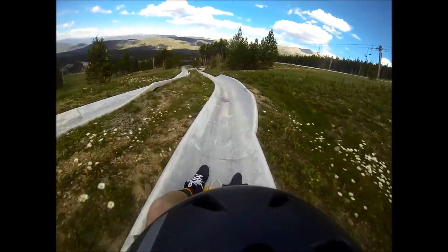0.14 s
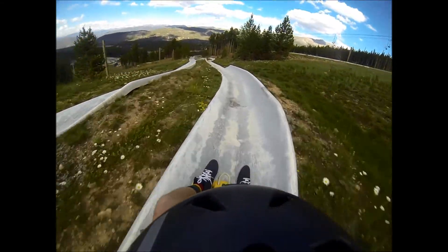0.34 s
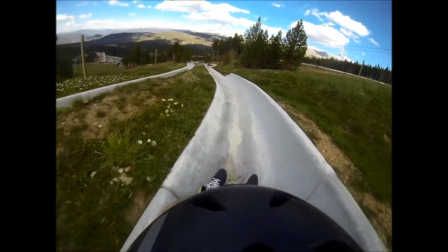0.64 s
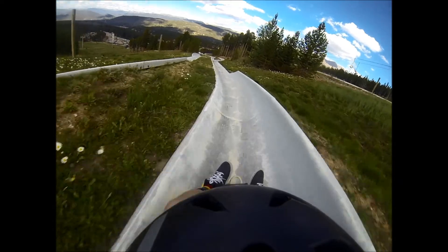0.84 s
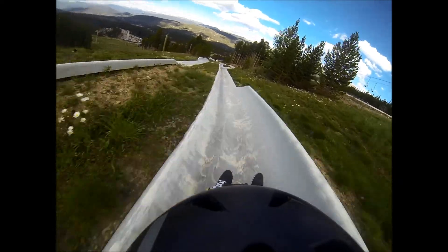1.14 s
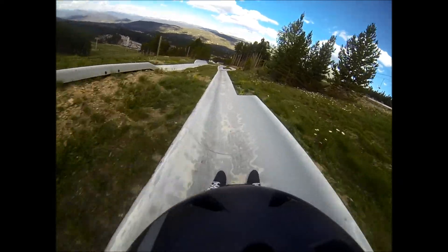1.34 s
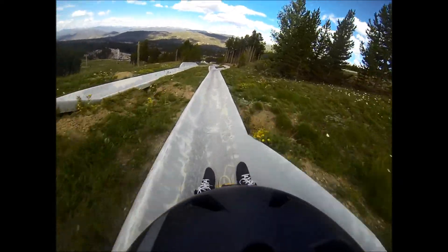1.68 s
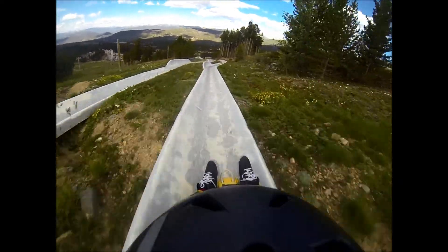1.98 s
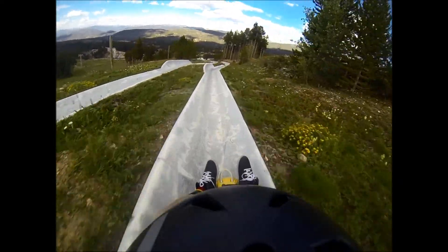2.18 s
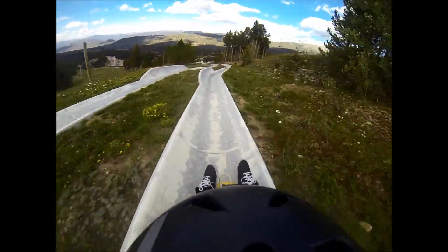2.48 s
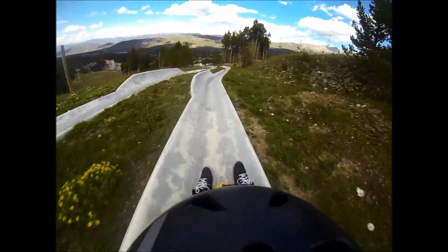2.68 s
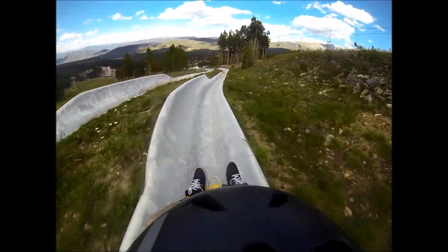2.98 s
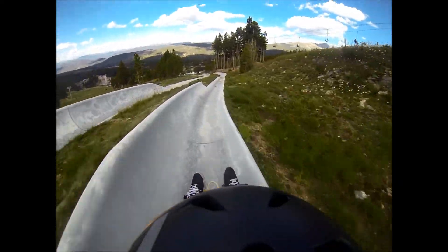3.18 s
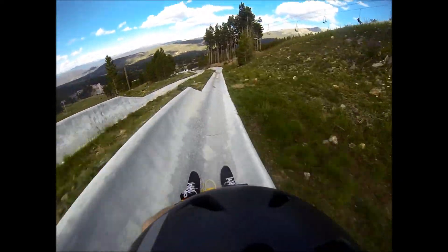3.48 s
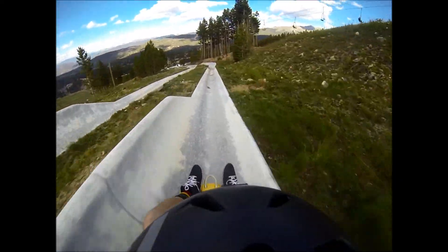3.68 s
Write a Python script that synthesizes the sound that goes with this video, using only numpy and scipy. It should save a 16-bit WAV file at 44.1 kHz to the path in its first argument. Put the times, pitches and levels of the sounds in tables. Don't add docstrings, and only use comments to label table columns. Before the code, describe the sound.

A wheeled sled roars steadily down an outdoor concrete chute, easing briefly near one second, then growing stronger. Joints thump, deep wind buffets the helmet-mounted microphone, and its case ticks lightly.

```python
import sys
import numpy as np
from scipy import signal
from scipy.fft import rfft, irfft, next_fast_len
from scipy.io import wavfile
from scipy.ndimage import uniform_filter1d

SR = 44100
rng = np.random.default_rng(int(sys.argv[2]) if len(sys.argv) > 2 else 0)


def natural_amplitude(level_db):
    exponent = np.asarray(level_db, float) / 20
    return 10 ** exponent


def master(y):
    cut = np.clip(np.atleast_2d(y).T, -1, 1)
    pcm = np.round(cut * 32767)
    wavfile.write(sys.argv[1], SR, pcm.astype(np.int16))


N = 168903

# time_s, roar_db, extra load on the sled body load_db
ROLLING_EFFORT = [(0, -51.5, 12), (.2, -47.5, 3.5), (.45, -47, 9), (.72, -47, 4.5), (.84, -57, 5.5),
                  (1.05, -53, 6), (1.16, -49.5, 4), (1.36, -51.5, 8), (1.5, -47, 2.5), (1.64, -43, 9),
                  (2.04, -45.5, 5.5), (2.14, -41.5, 7.5), (2.55, -43.5, 5.5), (2.95, -43.5, 9.5),
                  (3.01, -48.5, 11), (3.3, -48.5, 9.5), (3.5, -46, 8), (3.83, -45.5, 4.5)]
# start_s, peak_db, pitch_hz, t60_s
JOINTS = [(0.191, -34.5, 204, 0.1), (0.216, -37.5, 370, 0.085), (0.337, -36, 90, .1),
          (.40, -32.5, 290, 0.054), (0.418, -29.5, 130, .08), (0.529, -30, 127, 0.076),
          (0.581, -38, 197, 0.18), (0.619, -34, 212, 0.21), (.70, -32, 242, 0.12), (1.054, -33, 225, 0.04),
          (1.056, -39, 289, 0.033), (1.136, -37, 196, 0.087), (1.225, -37.5, 252, 0.068),
          (1.227, -33.5, 316, .06), (1.325, -34.5, 228, 0.12), (1.355, -33, 286, .06),
          (1.45, -34.5, 285, 0.1), (1.454, -31.5, 125, 0.073), (1.585, -35, 213, 0.1),
          (1.679, -29, 109, .1), (1.706, -24, 243, 0.059), (1.832, -25, 162, 0.088),
          (1.899, -25, 89.5, 0.17), (2.045, -29.5, 129, 0.099), (2.129, -37.5, 133, 0.064),
          (2.186, -29.5, 119, .12), (2.401, -25, 174, 0.078), (2.576, -37, 136, 0.036),
          (2.656, -34, 135, 0.06), (2.781, -32.5, 167, 0.14), (3.102, -41, 99.6, .08),
          (3.318, -23.5, 90, 0.12), (3.32, -25.5, 230, 0.043), (3.472, -29, 120, 0.098),
          (3.64, -21, 75, .12), (3.657, -31, 205, 0.061)]
# centre_s, peak_db, pitch_hz
BUFFETS = [(.099, -25, 29.7), (.15, -23.5, 39), (0.282, -21, 31), (.365, -21, 45), (.526, -21, 36.7),
           (.602, -26, 37.5), (0.705, -19, 34.6), (0.789, -20, 25.6), (1.085, -22.5, 31.7),
           (1.151, -23.5, 42), (1.293, -18, 32.4), (1.395, -21.5, 35), (1.714, -24.5, 32.2),
           (2.061, -25, 24.8), (2.349, -22.5, 32), (2.44, -20.5, 30), (2.529, -17, 30.2),
           (2.627, -22, 29.7), (2.691, -21.5, 29), (2.965, -20.5, 28), (2.998, -19.5, 34.3),
           (3.314, -20, 33.8), (3.345, -26, 42.3), (3.576, -18.5, 25.6), (3.643, -20, 43.2),
           (3.769, -25, 25.8)]


def rms_one(x):
    return x / np.sqrt(np.mean(x ** 2) + 1e-20)


def in_time(rows):
    s, *columns = np.transpose(rows)
    return [np.interp(np.arange(N) / SR, s, c) for c in columns]


def drift(rate):
    step = 40
    r = np.exp(-2 * np.pi * rate * step / SR)
    slow = signal.lfilter([1], [1, -2 * r, r * r], rng.standard_normal(N // step + 2002))[2000:]
    return np.interp(np.arange(N) / step, np.arange(len(slow)), rms_one(slow - slow.mean()))


def ring(clicks, hz, t60):
    r = natural_amplitude(-60 / (t60 * SR))
    w = 2 * np.pi * hz / SR
    return signal.lfilter([0, np.sin(w)], [1, -2 * r * np.cos(w), r * r], clicks + 1e-18)


def struck(hits, hz, t60):
    contact_s = .0008
    push = ring(hits, hz, contact_s * np.log(1000))
    return ring(push, hz, t60) * 2 / (contact_s * SR)


def click(s, db):
    return natural_amplitude(db) * (np.arange(N) == int(s * SR))


def coloured(source, spectrum, shared_db, own_db, rate):
    hz, db = np.transpose(spectrum)
    size = next_fast_len(N)
    octave = np.log2(np.maximum(np.arange(size // 2 + 1) * SR / size, 1))
    low, high = np.log2(hz[0]), np.log2(hz[-1])
    outside = np.maximum(low - octave, 0) + np.maximum(octave - high, 0)
    shape = natural_amplitude(np.interp(octave, np.log2(hz), db) - 40 * outside)
    full = rfft(source, size) * shape
    together, out = drift(rate), 0
    for centre in np.arange(low - 1, high + 1, .5):
        window = np.cos(np.pi * np.clip(octave - centre, -.5, .5)) ** 2
        band = irfft(full * window, size)[:N]
        out = out + band * natural_amplitude(shared_db * together + own_db * drift(rate))
    return rms_one(out)


def whine():
    t = np.arange(N) / SR
    roar_db, _ = in_time(ROLLING_EFFORT)
    effort_db = uniform_filter1d(roar_db - roar_db.mean(), size=2000)
    bursts_hz, pitch_hz = 48, 6440
    bursts = np.clip(np.sin(2 * np.pi * bursts_hz * t + 0.99), 0, 1) * natural_amplitude(1.8 * drift(9.0))
    phase = 2 * np.pi * np.cumsum(pitch_hz + 11 * drift(40.0)) / SR
    tone = natural_amplitude(-83.5 + .4 * effort_db) * np.sin(phase)
    overtone = natural_amplitude(-93.5 + .9 * effort_db) * np.sin(2 * phase)
    return bursts * (tone + overtone)


def air():
    # pitch_hz, level_db per Hz
    air_spectrum = [(380, -21), (480, 0), (620, -1), (800, -5), (1000, -21)]
    return natural_amplitude(-64.5) * coloured(rng.standard_normal(N), air_spectrum, shared_db=-0.4, own_db=2.8, rate=3.0)


def sing():
    # start_s, length_s, pitch_hz, level_db
    panel_mode = (2.26, .13, 742, -48)
    start, length, hz, db = panel_mode
    t = np.arange(N) / SR
    swell = np.sin(np.pi * np.clip((t - start) / length, 0, 1))
    return natural_amplitude(db) * swell * np.sin(2 * np.pi * hz * t)


def wind():
    # time_s, level_db
    gust_curve = [(0, -29), (.3, -31.5), (.6, -28.5), (.83, -36), (.98, -35), (1.2, -29.5), (1.36, -28.5),
                  (1.48, -33), (1.9, -30.5), (2.25, -32.5), (2.4, -27), (2.7, -30.5), (2.95, -28.5),
                  (3.1, -33.5), (3.3, -42.5), (3.45, -27), (3.65, -29.5), (3.83, -29)]
    # pitch_hz, level_db per Hz
    wind_spectrum = [(7.1, -26), (12, 5), (27, 4.5), (37, 6), (48, -1.5), (70, -18.5), (110, -21),
                     (140, -41.5), (240, -120)]
    gust_db, = in_time(gust_curve)
    eddies = coloured(rng.standard_normal(N), wind_spectrum, shared_db=2.94, own_db=-1.5, rate=1.1)
    swell = uniform_filter1d(uniform_filter1d(eddies ** 2, size=SR // 16), size=SR // 16)
    return natural_amplitude(gust_db) * rms_one(eddies / (swell + 0.022) ** 0.15)


def buffets():
    t = np.arange(N) / SR
    out = 0
    for s, db, hz in BUFFETS:
        envelope = np.exp(-((t - s) * hz / 0.61) ** 2)
        out = out - natural_amplitude(db) * envelope * np.cos(2 * np.pi * hz * (t - s))
    return out


def ticks():
    # start_s, peak_db, strongest pitch_hz, spread_octaves
    mount_ticks = [(.1935, -65, 5040, 0.27), (.3375, -58, 3550, .2), (.350, -71, 6560, 0.4),
                   (.4625, -46, 2170, 0.55), (.4635, -56.5, 3600, 0.47), (.589, -61, 3450, .4),
                   (.589, -82, 8260, .2), (.610, -65, 5000, 0.27), (.610, -75.5, 9000, 0.52),
                   (.619, -54, 3100, 0.22), (.620, -68, 5660, .2), (.698, -75, 8500, .4),
                   (.701, -80, 11300, .3), (1.088, -67, 3650, 0.37), (1.5015, -75, 5200, 0.22),
                   (1.5025, -49, 3200, 0.14), (1.525, -55, 5360, .25), (1.5255, -71, 8400, 0.26),
                   (1.526, -50.5, 3240, 0.14), (2.158, -54, 2400, 0.48), (2.820, -46, 3020, .35),
                   (3.2795, -57.5, 3500, 0.21), (3.280, -55, 5140, 0.31), (3.325, -57, 2240, 0.62),
                   (3.368, -62, 4650, 0.25), (3.374, -60, 3800, 0.17)]
    # pitch_hz, level_db, t60_s
    case_modes = [(2100, 4, 0.015), (2280, 6, 0.032), (2690, -18, 0.0089), (3430, -4.5, 0.045),
                  (3800, -11.5, 0.013), (5000, -4, 0.041), (5250, -8, 0.043), (6070, -14.5, 0.033),
                  (6760, -14, .01), (7100, -10, 0.019), (8400, -15.5, 0.012)]
    shape = len(mount_ticks), len(case_modes)
    luck_db = rng.normal(0, 2.0, shape)
    late_s = rng.uniform(0, 0.001, shape)
    out = 0
    for k, (hz, db, t60) in enumerate(case_modes):
        hits = 0
        for i, (s, peak, top, wide) in enumerate(mount_ticks):
            distance_db = 6 * (np.log2(hz / top) / wide) ** 2
            hits = hits + click(s + late_s[i, k], peak + db - distance_db + luck_db[i, k])
        out = out + struck(hits, hz, t60)

    t = np.arange(SR // 25) / SR
    for s, peak, top, wide in mount_ticks:
        noise = rng.standard_normal(len(t))
        edges_hz = np.clip(top * 2 ** (wide * np.array([-1, 1])), 500, 18000)
        band = signal.butter(3, edges_hz, "band", fs=SR, output="sos")
        crack = signal.sosfilt(band, noise * np.exp(-t / .0028))
        crack = crack / np.std(signal.sosfilt(band, noise)) / 2
        own_ring = struck(1. * (t == 0), top, .013)
        out[int(s * SR):][:len(t)] += natural_amplitude(peak + 3) * crack + natural_amplitude(peak - 7) * own_ring
    return out


def thumps():
    # start_s, peak_db
    deck_knock = (3.2805, -31)
    # pitch_hz, level_db, t60_s
    deck_modes = [(850, -7, .055), (1400, -1, .06), (1600, -5, .035), (2300, -13, .02)]
    low = sum(ring(click(s, db + 1.5), hz, t60) for s, db, hz, t60 in JOINTS)
    soft = signal.sosfilt(signal.butter(2, 600, fs=SR, output="sos"), low)
    knock_s, knock_db = deck_knock
    return soft + sum(struck(click(knock_s, knock_db + db), hz, t60) for hz, db, t60 in deck_modes)


def grit():
    contacts_per_s, spread_db = 3500, 1.5
    sizes = natural_amplitude(spread_db * np.minimum(rng.exponential(1, N), 3.5)) * rng.choice([-1, 1], N)
    return sizes * (rng.random(N) < contacts_per_s / SR)


def rolling():
    # pitch_hz, level_db per Hz
    body_spectrum = [(32, -51.5), (55, -0.5), (65, 0.5), (113, 1.5), (209, -3.5), (244, -4.5), (332, -7.5),
                     (650, -22), (840, -49), (1430, -120)]
    # pitch_hz, level_db per Hz
    roar_spectrum = [(320, -49), (550, -26), (654, -19), (727, -2), (788, -2), (1500, 2.5), (1730, -5),
                     (1970, -12.5), (2700, -26.5), (3510, -54.5), (5940, -120)]
    # pitch_hz, level_db per Hz
    rush_spectrum = [(2400, 1), (2750, -6), (3450, -6.5), (4400, -19.5), (5200, -16.5), (6000, -18),
                     (8500, -31), (13500, -43)]
    roar_db, load_db = in_time(ROLLING_EFFORT)
    contacts = grit()

    t, dip_s = np.arange(N) / SR, 0.019
    dips = sum(np.exp(-((t - row[0] - dip_s) / dip_s) ** 2) for row in JOINTS)
    dip_db = -1 * np.minimum(dips, 1)
    body = coloured(contacts, body_spectrum, shared_db=1.4, own_db=-0.5, rate=11.0)
    body = natural_amplitude(roar_db + load_db + dip_db + 0.75) * body
    roar = natural_amplitude(roar_db + 0.4) * coloured(contacts, roar_spectrum, shared_db=0.29, own_db=1.05, rate=6.8)

    rush = coloured(rng.standard_normal(N), rush_spectrum, shared_db=.9, own_db=1.0, rate=9.0)
    rush = rush + natural_amplitude(-18.5) * rms_one(ring(rush, 5370, 0.0053))
    rush_db = -69.5 + .62 * (roar_db - roar_db.mean())
    return body + roar + natural_amplitude(rush_db) * rush


def scene():
    t, lull_s = np.arange(N) / SR, 0.023
    nearness = sum(np.exp(-((t - s) / lull_s) ** 2) for s, db, hz in BUFFETS)
    lull = np.clip(1.25 - 1.03 * nearness, 0, 1)
    flow = whine() + air() + lull * wind() + buffets()
    return (flow + sing() + ticks() + thumps() + rolling())[None]


def roll_off(x):
    return signal.sosfilt(signal.butter(12, 13600, fs=SR, output="sos"), x)


def record(dry):
    fade_in = np.minimum(np.arange(N) / 200, 1)
    mix = .22 * np.tanh(dry / .22) * fade_in
    return roll_off(mix)


dry = scene()
out = record(dry)
master(out)
```